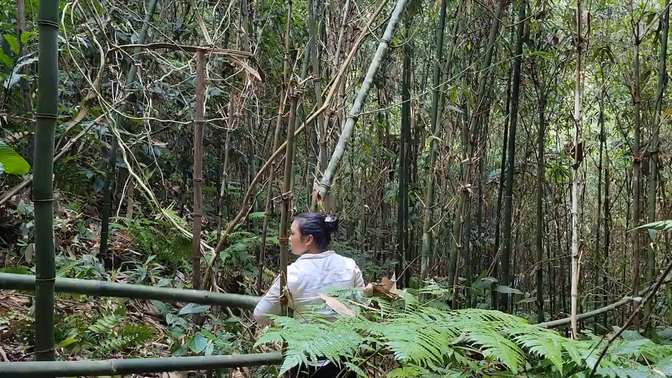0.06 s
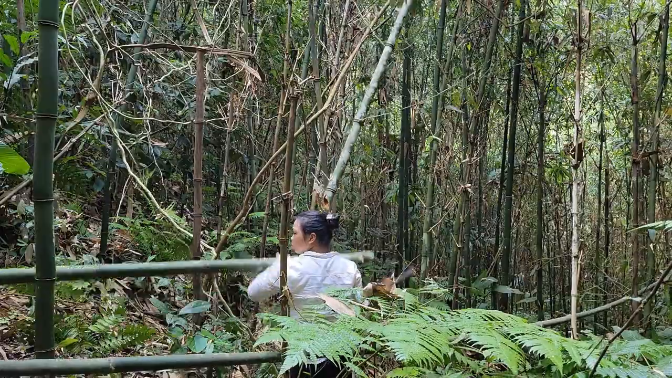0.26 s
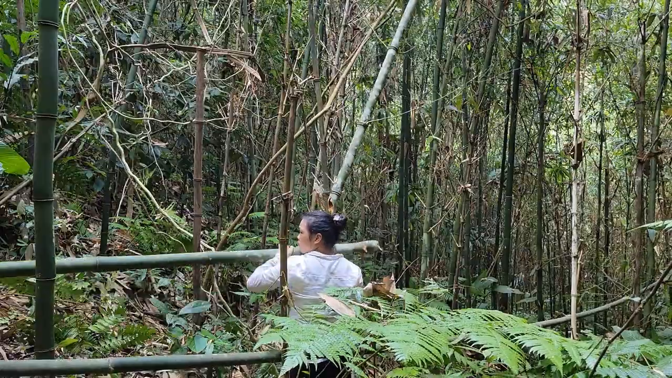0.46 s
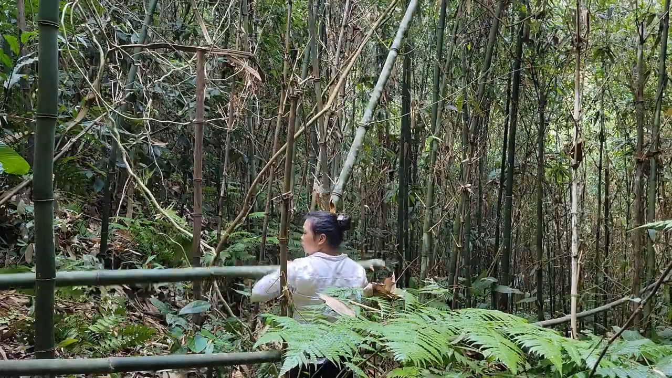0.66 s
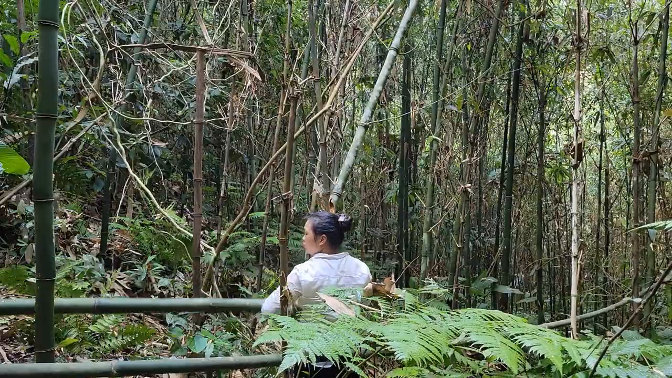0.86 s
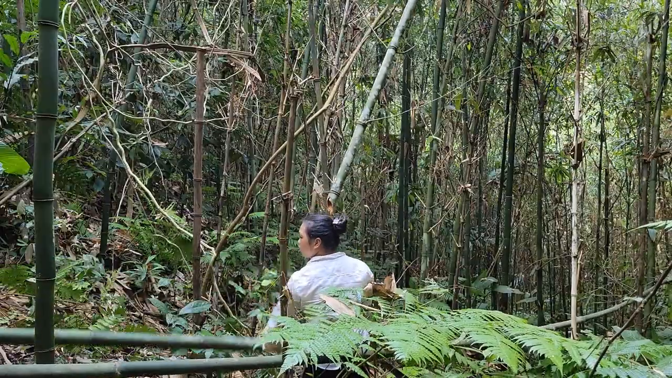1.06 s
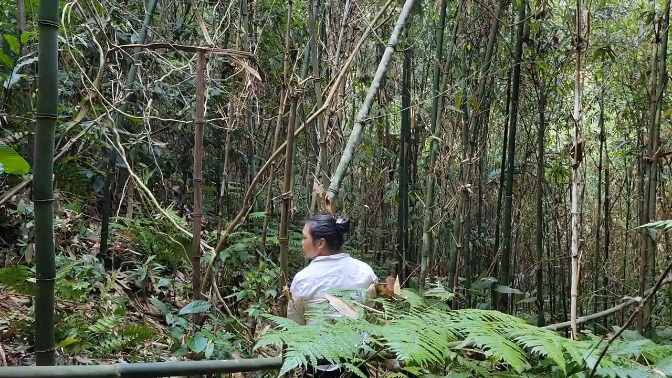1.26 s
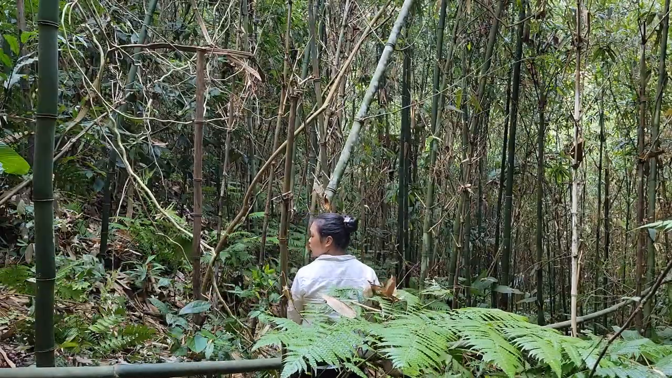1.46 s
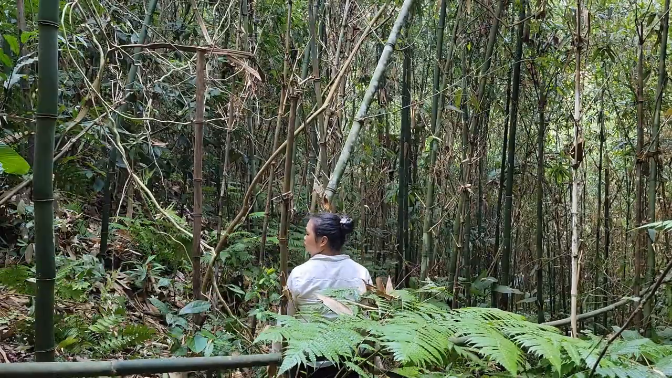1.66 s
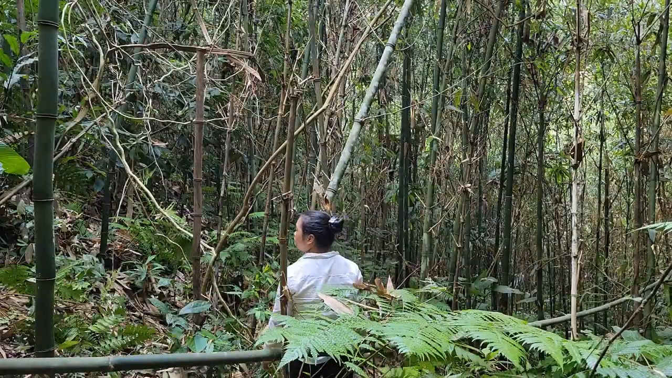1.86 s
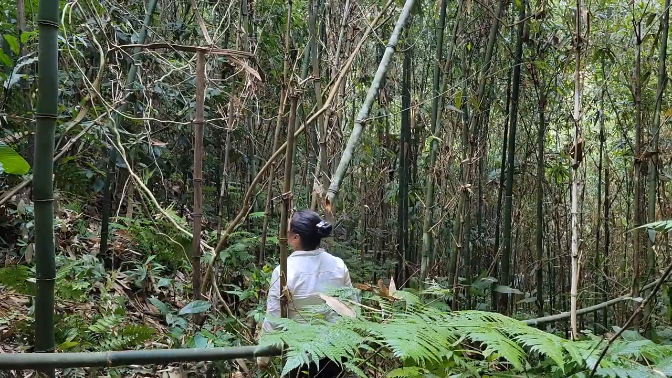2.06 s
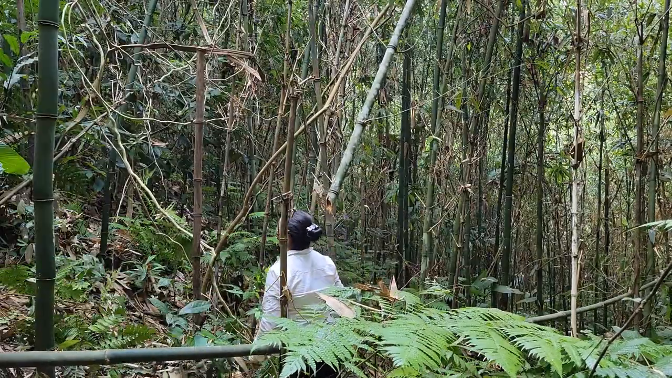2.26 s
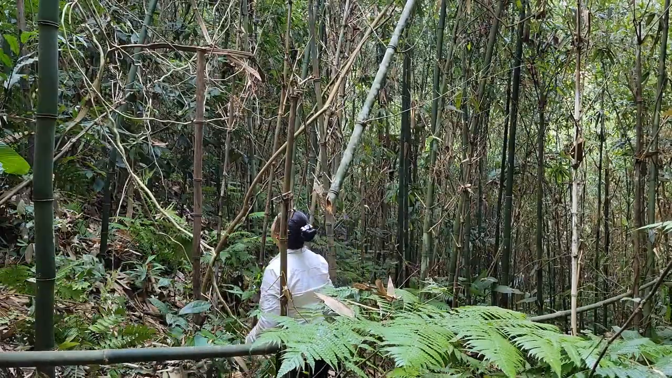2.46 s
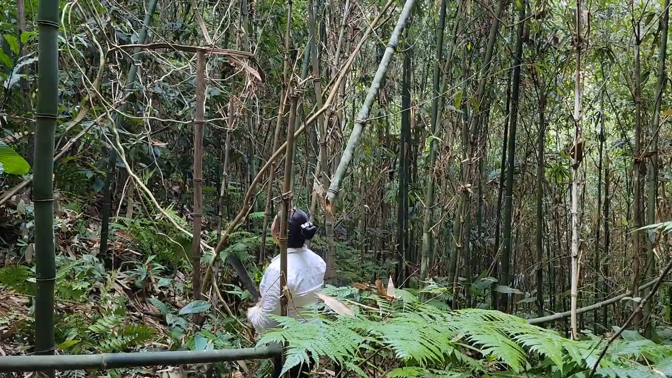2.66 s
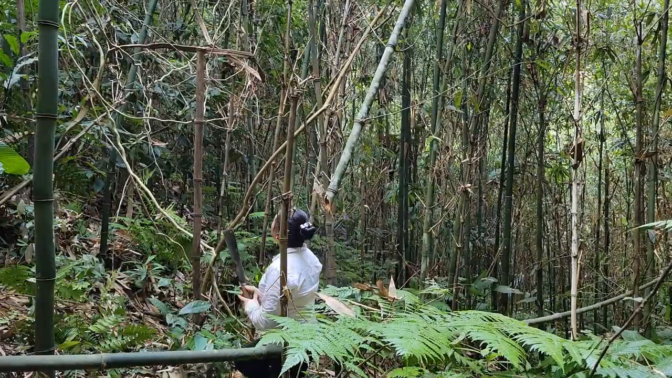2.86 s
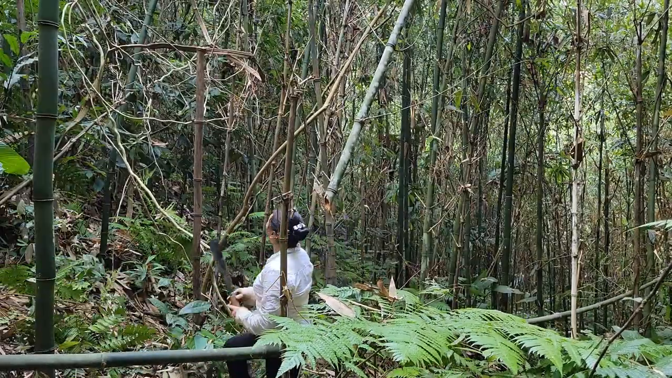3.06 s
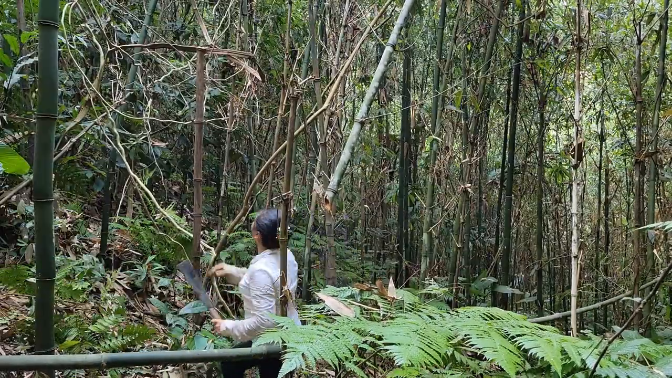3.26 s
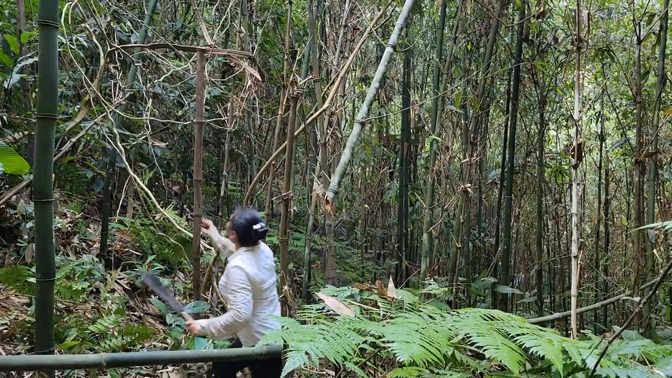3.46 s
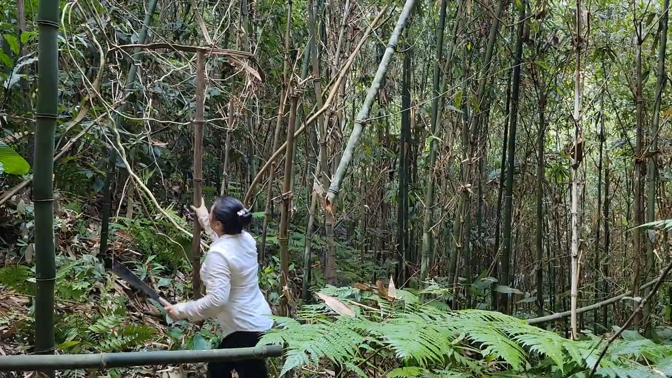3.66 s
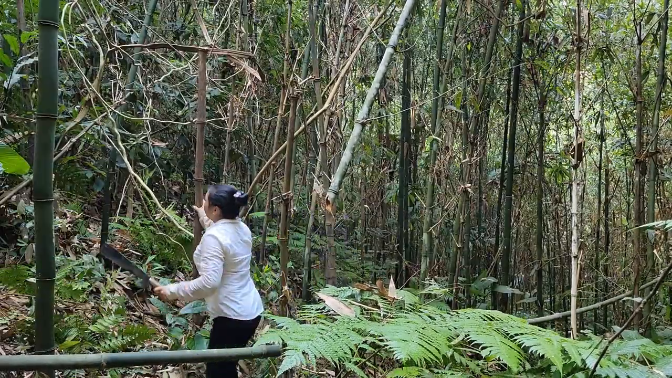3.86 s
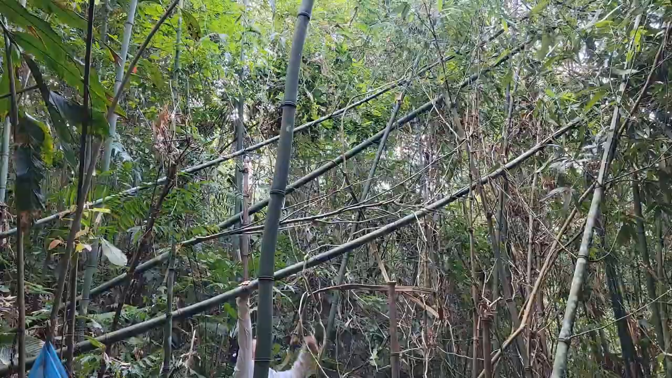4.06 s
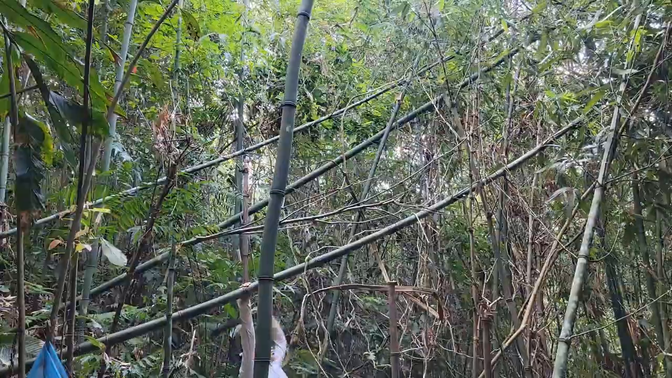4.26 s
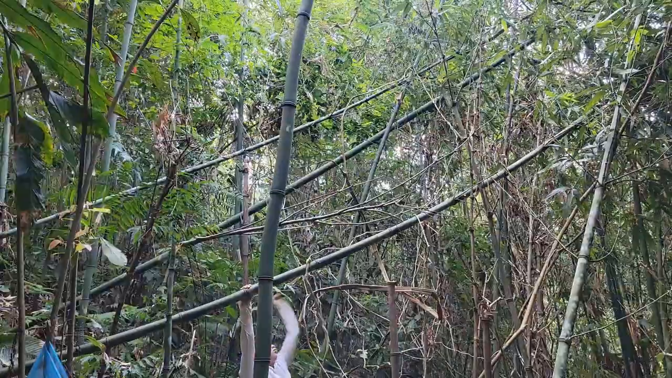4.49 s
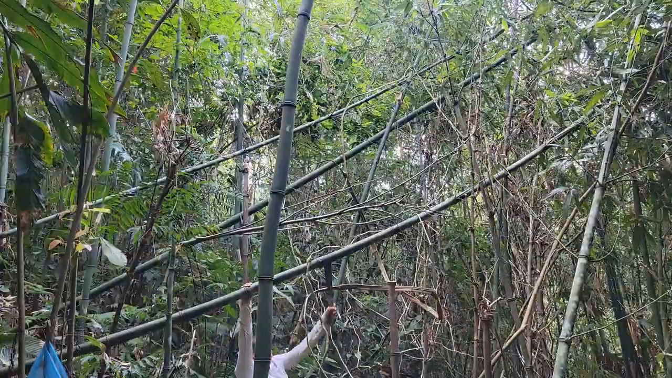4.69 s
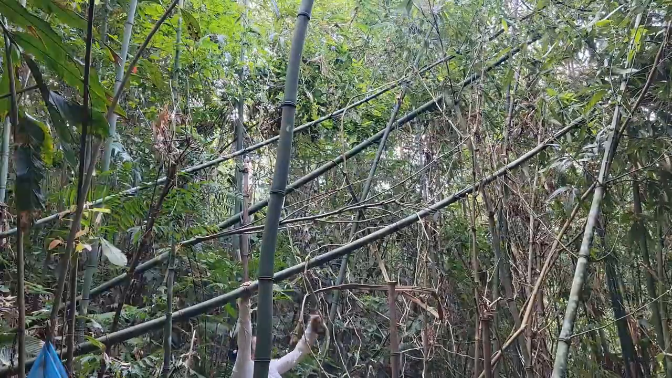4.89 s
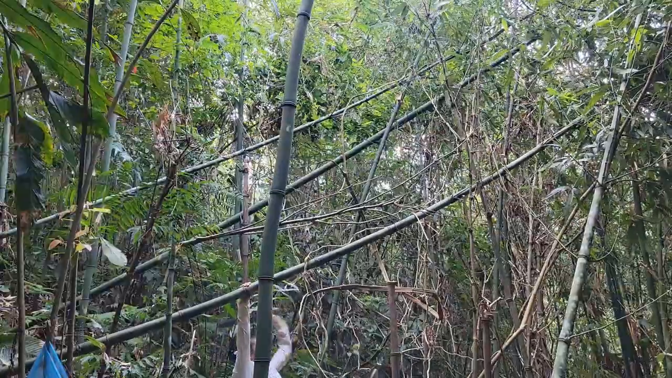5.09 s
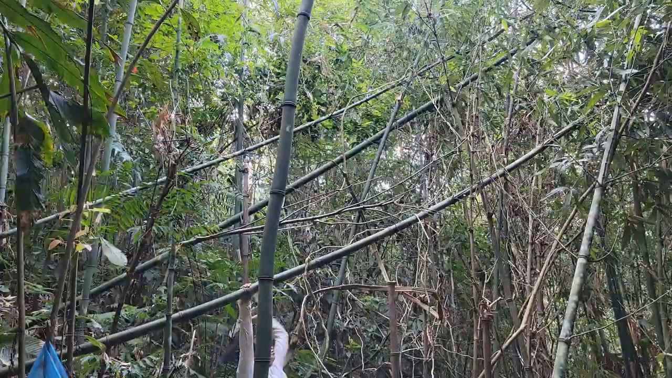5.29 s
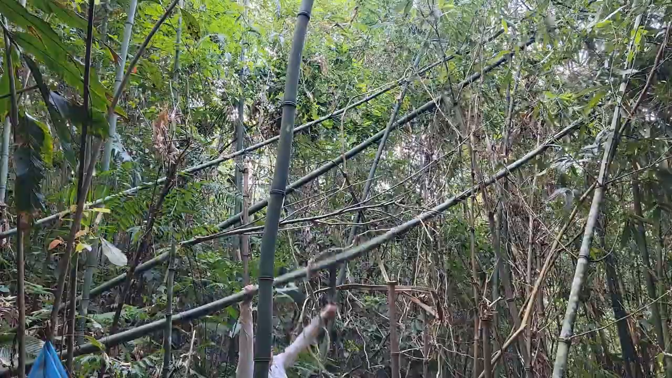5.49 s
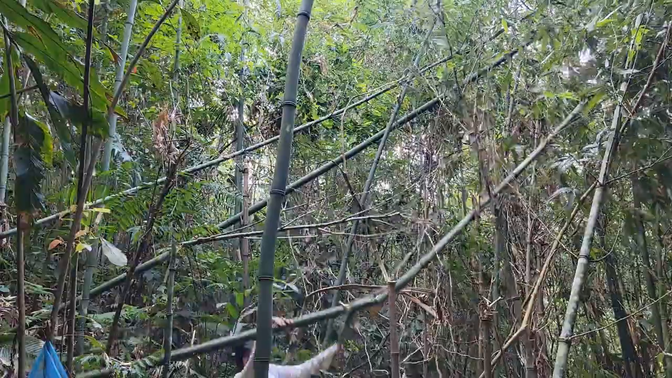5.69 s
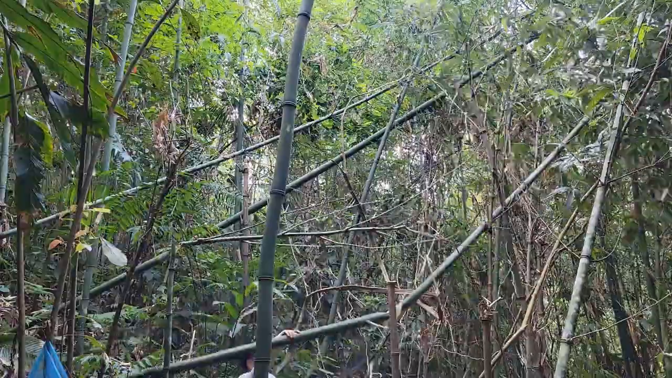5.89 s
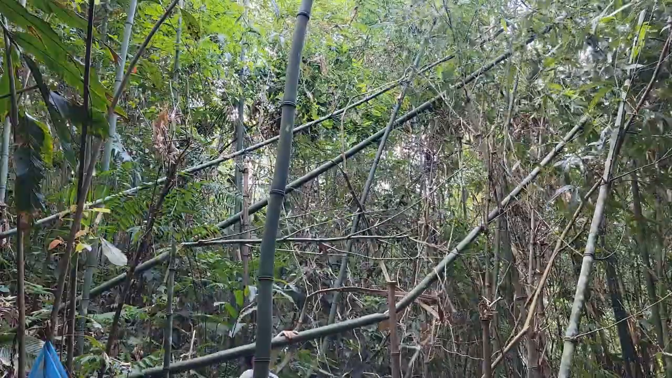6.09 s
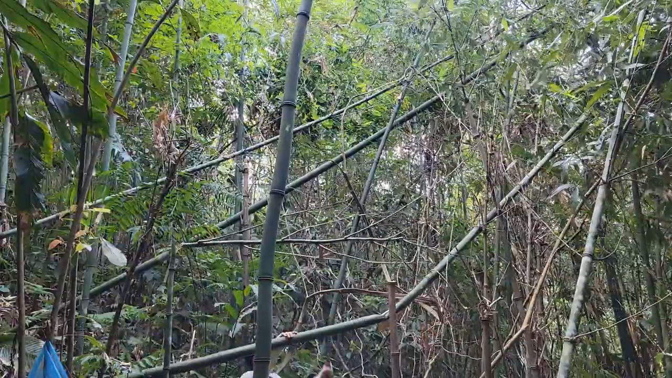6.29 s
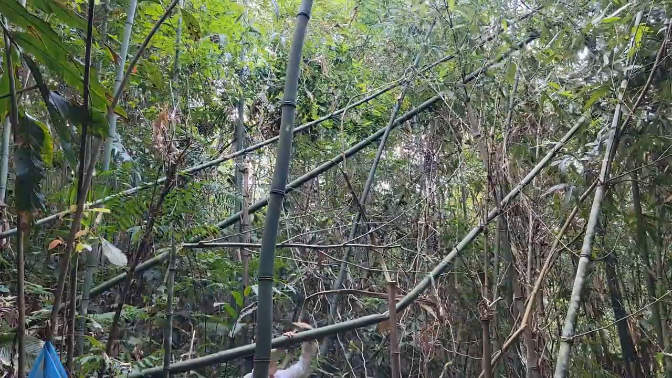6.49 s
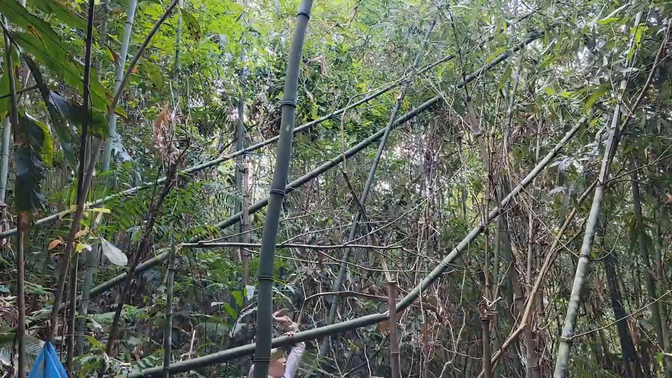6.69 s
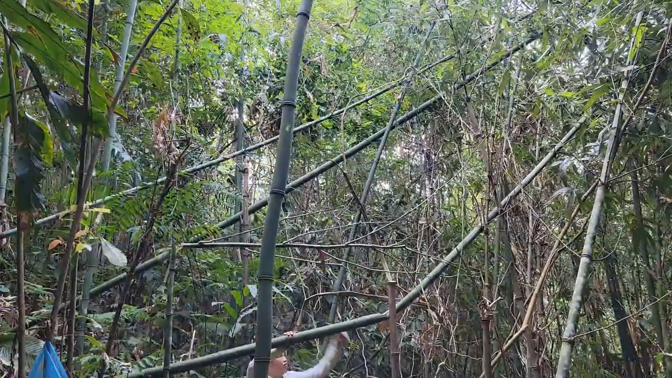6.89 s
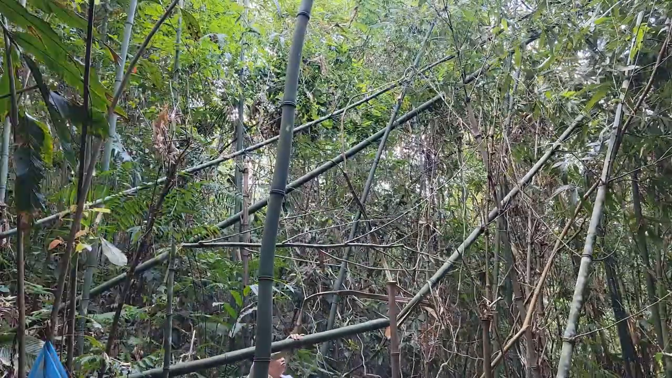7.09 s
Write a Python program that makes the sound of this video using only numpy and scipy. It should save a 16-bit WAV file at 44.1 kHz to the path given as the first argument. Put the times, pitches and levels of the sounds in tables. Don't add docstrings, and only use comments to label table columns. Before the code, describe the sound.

A cut bamboo pole knocks and drags through dry leaves, then after a quiet pause a blade cracks a hollow stem, which splits and rattles down.

```python
import sys
import numpy as np
from scipy import signal
from scipy.io import wavfile
from scipy.ndimage import uniform_filter1d

SR = 44100
rng = np.random.default_rng(int(sys.argv[2]) if len(sys.argv) > 2 else 0)


def rack_gain(trim_db):
    fader = np.asarray(trim_db, float)
    return 10 ** (fader / 20)


def unload_wav(signal):
    wavfile.write(
        sys.argv[1],
        SR,
        np.round(np.clip(np.atleast_2d(signal).T, -1, 1) * 32767).astype(np.int16),
    )


N = 314874

# pitch_hz, likeness (0 to 1)
LIKENESS = [(60, 0.18), (250, 0.14), (600, 0.082), (1200, 0.046), (3000, 0.037), (12000, 0.034)]


def evened(x):
    return x / np.sqrt(np.mean(x ** 2) + 1e-20)


def head(x):
    middle = x[:, :350].mean(0)
    return x / np.sqrt(np.mean(middle ** 2))


def read(points, hz):
    f, value = np.transpose(points)
    return np.interp(np.log(hz + 1), np.log(f + 1), value)


def add(mix, s, sound):
    part = mix[..., round(s * SR):][..., :sound.shape[-1]]
    part += sound[..., :part.shape[-1]]


def placed(sound, pan_db):
    return sound * rack_gain(np.array([[pan_db / 2], [-pan_db / 2]]))


def resonate(x, hz, width):
    r = np.exp(-np.pi * max(width, 10) / SR)
    return signal.lfilter([1 - r, 0, -(1 - r) * r], [1, -2 * r * np.cos(2 * np.pi * hz / SR), r * r], x)


def treble(x, hz):
    return signal.sosfilt(signal.butter(2, hz, "high", fs=SR, output="sos"), x)


def smooth_noise(samples):
    once = uniform_filter1d(rng.standard_normal(N), size=samples)
    return evened(uniform_filter1d(once, size=samples))


def swell(t, s, db, rise_s, fall_s):
    rise, fall = (s - t) / max(rise_s, .001), (t - s) / max(fall_s, .001)
    return rack_gain(db - 10 * np.where(t < s, rise, fall))


def tie(z, hz):
    same = np.clip(read(LIKENESS, hz), 0, 1)[:, None]
    return np.array([z[0], same * z[0] + np.sqrt(1 - same ** 2) * z[1]])


def ports(pair, spectrum, patchy_db):
    hz, t, z = signal.stft(pair, SR, nperseg=512, noverlap=384)
    patches = rng.standard_normal((len(hz), len(t)))
    patches = uniform_filter1d(patches, size=6, axis=0)
    patches = evened(uniform_filter1d(patches, size=14, axis=1))
    colour = rack_gain(read(spectrum, hz)[:, None] + patchy_db * patches)
    sound = signal.istft(tie(z, hz) * colour, nperseg=512, noverlap=384)[1]
    return evened(sound[:, :N])


def crackle(per_s, spread_db, hiss, flicker_db):
    happens = rng.random(N) < per_s / SR
    size = rack_gain(spread_db * np.minimum(rng.exponential(1, N), 5)) * happens
    fizz = signal.oaconvolve(size, np.exp(-np.arange(600) / 90))[:N]
    gain = (evened(fizz) + hiss) * rack_gain(flicker_db * smooth_noise(700))
    return gain * rng.standard_normal((2, N))


def air():
    # pitch_hz, level_db (per Hz)
    air_colour = [(15, -47), (25, 3.5), (149, -22.5), (293, 1.5), (451, -15), (560, 4), (659, -12),
                  (1610, -12.5), (7900, -14), (8200, -27), (16000, -30.5)]
    # pitch_hz, width_hz, level_db
    drone = [(60, 39.4, -90), (284.4, 46, -82.5), (571.6, 38, -79.5)]
    # low_hz, high_hz
    insect_band = (6500, 7950)
    air_db, insects_db = -72, -72.5
    noise = rng.standard_normal((2, N))
    hum = noise[0] + 0.5 * noise[::-1]
    waver = rack_gain(0.7 * smooth_noise(5000))
    bands = np.zeros((2, N))
    for hz, width, db in drone:
        bands += waver * rack_gain(db) * evened(resonate(resonate(hum, hz, width), hz, width))
    only_insects = signal.butter(8, insect_band, "band", fs=SR, output="sos")
    bands += rack_gain(insects_db) * evened(signal.sosfilt(only_insects, noise))
    return rack_gain(air_db) * ports(rng.standard_normal((2, N)), air_colour, 0.8) + bands


def leaves():
    # peak_s, level_db, rise_s and fall_s (per 10 dB), crisp_db (over body)
    stirs = [(0.0, -70, .1, 0.3, -6), (0.113, -54, 0.002, 0.035, -8), (0.275, -60.5, 0.03, 0.1, -6),
             (0.325, -58.5, 0.06, 0.07, -5), (0.6, -67, 2.5, .5, -7.5), (0.98, -68.5, 0.2, 0.5, -12),
             (1.14, -49.5, 0.0959, 0.0643, -3), (1.212, -46.5, 0.008, 0.05, -2),
             (1.35, -44.5, 0.08, 0.1578, -6), (1.56, -56, 0.12, 0.15, 3), (1.71, -52, 0.035, 0.06, 3),
             (1.745, -51, 0.03, 0.05, -2), (1.9, -59, 0.12, 0.2, -4), (1.938, -52, 0.012, 0.06, 0),
             (2.14, -60.5, 0.5, 0.04, -6), (2.56, -65, 0.2, 0.08, -6.5), (2.72, -68, 0.04, 0.04, -3),
             (3.05, -68, -0.03, -0.1, -18), (3.51, -66, 0.14, 0.1, -6.5), (3.73, -67, 0.1, -0.06, -9),
             (3.8, -69, -0.37, 0.04, -5), (3.83, -72, 1, 0.6, -6), (3.91, -61, -1.05, -0.1, -9)]
    shakes = [(4.07, -57, 0.016, 0.1, -0.5), (4.2, -63, 0.089, 1, -4), (4.668, -27, 0.0078, 0.046, -10),
              (4.72, -46, 0.05, 0.1, -16), (4.81, -52, .04, 0.067, -20), (4.93, -61, .15, 0.39, -8),
              (5.35, -68.5, 0.28, 0.26, -17), (5.48, -46, 0.0026, 0.44, -5), (5.65, -28, 0.012, 0.058, -22),
              (5.71, -38.5, .05, 0.14, -3.5), (5.81, -43.5, 0.09, 0.091, -10.5),
              (6.0, -50.5, 0.26, 0.39, -3), (6.048, -57, .02, .02, 0), (6.2, -51, 0.33, 0.43, -9.5),
              (6.6, -60, 0.011, 0.053, -2.5), (6.7, -57.5, .01, 0.047, -11), (6.77, -61, .3, 0.62, -8),
              (6.78, -53.5, 0.011, 0.04, -11.5), (7.04, -32, 0.03, 0.08, -19)]
    treads = [
        (3.16, -52.5, 0.038, 0.06, -5),
        (3.25, -64, 0.054, 0.12, -7),
    ]
    # pitch_hz, level_db
    leaf_colour = [(1200, -12), (2000, -6.5), (2900, -4), (4000, -5), (6000, -5.5), (8500, -11.5),
                   (10000, -27.5)]
    # pitch_hz, level_db
    crisp_colour = [(6000, -15.5), (8000, -4), (11000, -1), (13000, 0.5), (15800, 0.5)]
    # pitch_hz, level_db
    stalk_colour = [(120, -25.5), (250, -10.5), (600, 3.5), (1200, 1.5), (2000, -3.5), (3000, -23)]
    stalks_at_rest_db = -76.5
    t = np.arange(0, N + 32, 32) / SR
    power = np.zeros((3, len(t)))
    power[2] = rack_gain(stalks_at_rest_db) ** 2
    for rows, stalk_db in ((stirs, -11), (shakes, -7), (treads, -4)):
        for *shape, crisp_db in rows:
            share = rack_gain(np.array([[0], [crisp_db], [stalk_db]]))
            power += (share * swell(t, *shape)) ** 2
    body, crisp, stalk = (np.interp(np.arange(N) / SR, t, np.sqrt(p)) for p in power)
    dry_leaves = crackle(per_s=400, spread_db=2.5, hiss=2.6, flicker_db=.9)
    stalks = crackle(per_s=290, spread_db=1.5, hiss=0.97, flicker_db=0.4)
    bed = body * ports(dry_leaves, leaf_colour, 1.4)
    bed += crisp * ports(dry_leaves, crisp_colour, 1.1)
    return bed + stalk * ports(stalks, stalk_colour, 2.5)


def scrape():
    # peak_s, level_db, rise_s and fall_s (per 10 dB)
    drags = [
        (.99, -72, 0.2, 0.4),
        (1.1, -64, 0.02, 0.2),
        (1.245, -66, -0.1, 0.13),
        (1.44, -61, -0.04, 0.21),
        (1.64, -63.5, 0.18, 0.35),
        (1.73, -57, -0.07, 0.1),
    ]
    # pitch_hz, level_db
    skin_colour = [(1800, -32), (2400, 0), (2900, 6), (3300, -9), (4200, -30)]
    t = np.arange(N) / SR
    gain = np.sqrt(sum(swell(t, *row) ** 2 for row in drags))
    return gain * ports(crackle(per_s=310, spread_db=3.0, hiss=.8, flicker_db=-1.0), skin_colour, 1.0)


def boom(length_s, db, hz, chance):
    rumble_share, rumble_hz, rumble_width_hz = 0.15, 84, 50
    t = np.arange(round(length_s * SR)) / SR
    tone = np.sqrt(2) * np.sin(2 * np.pi * hz * t)
    rumble = resonate(chance, rumble_hz, rumble_width_hz)
    rumble = evened(resonate(rumble, rumble_hz, rumble_width_hz))
    two_rumbles = np.array([rumble[-len(t):], rumble[2000:][:len(t)]])
    return rack_gain(db + 0.5) * np.hanning(len(t)) * (tone + rumble_share * two_rumbles)


def booms(mix):
    # middle_s, length_s, level_db, pitch_hz
    bumps = [(1.092, .06, -63, 80), (1.15, .09, -65, 76), (1.25, .12, -46, 75), (1.365, .05, -41, 87),
             (1.392, .055, -40, 80), (1.445, .06, -53, 100), (1.482, .04, -59, 98), (1.53, .06, -60, 103),
             (1.575, .09, -57, 107), (1.62, .06, -64, 105), (1.745, .04, -52, 84), (1.77, .05, -48, 77),
             (1.81, .06, -61, 90), (3.16, .08, -76, 140), (4.675, .05, -51, 120), (4.745, .07, -62, 120),
             (5.545, .06, -52, 75), (5.6, .08, -53, 110), (5.69, .1, -63, 105), (6.062, .04, -61, 72),
             (6.09, .06, -63, 125), (6.138, .07, -61, 73), (6.235, .07, -68, 88), (6.298, .04, -66, 80),
             (6.358, .045, -64, 82), (6.395, .035, -64, 90), (7.017, .035, -50, 95), (7.068, .04, -50, 101),
             (7.095, .035, -56, 100), (7.125, .04, -65, 92), (1.25, .12, -60, 45), (1.385, .08, -54, 48),
             (1.4, .1, -60, 175), (1.55, .1, -68, 170), (4.68, .08, -57, 60), (4.71, .06, -58, 150),
             (5.55, .06, -33, 225), (6.12, .05, -68, 190), (6.37, .05, -68, 200), (7.03, .08, -55, 50)]
    for s, length_s, db, hz in bumps:
        add(mix, s - length_s / 2, boom(length_s, db, hz, rng.standard_normal(SR // 4)))


def strike(db, modes, top_db, top_hz, t60, chance, shared, crack):
    t = np.arange(len(chance)) / SR
    onset = 1 - np.exp(-(t / .0003) ** 2)
    tearing = onset * (rack_gain(-60 * t / max(t60, .005)) + crack * np.exp(-t / .001))
    tearing *= .5 + 1.3 * (chance[:, 2] > 1.9)
    own, common = chance[:, :2].T, chance[:, 3]
    fibres = tearing * (own + shared * common)
    low = tearing * (common + 0.5 * own)
    ring = np.zeros_like(low)
    broad = rack_gain(db + top_db) * head(treble(fibres, top_hz))
    for hz, width, mode_db in modes:
        source = low if hz < 900 else fibres
        sound = treble(resonate(source, hz, max(width, 60)), .4 * hz)
        is_ring = width < 700
        if is_ring:
            sound = resonate(sound, hz, 1.5 * hz)
        add(ring if is_ring else broad, 0, rack_gain(db + mode_db) * head(sound))
    return ring, broad


def ticks(mix):
    # start_s, peak_db, pitch_hz, left_right_db
    snaps = [(0.2655, -50, 2650, 5), (0.5433, -55, 2150, 0.0), (0.952, -62, 2620, 2.0),
             (0.97, -54, 2630, -2), (1.025, -59, 2800, 2.0), (1.059, -59, 3040, 3.0), (1.088, -47, 3000, 7),
             (1.0974, -55, 2650, 3.5), (1.14, -52, 2490, 3.0), (1.2088, -40, 4720, 1.0),
             (1.5525, -51, 4830, 0), (1.6761, -42.5, 1880, 6), (1.7987, -44, 2290, 5),
             (2.1939, -55, 4960, -0.5), (2.491, -51.5, 5480, -3), (2.5578, -50, 2900, -1.0),
             (2.674, -55, 3060, -5), (2.9394, -70, 4610, -1.5), (3.1375, -46, 1780, 2),
             (3.2646, -52, 2040, 0.5), (3.3195, -53, 3000, 1.0), (3.363, -53.5, 1820, 2),
             (3.609, -52.5, 3070, 0.5), (3.711, -57, 2480, 2.0), (3.7916, -57, 2020, -4),
             (3.879, -61, 1810, -0.5), (4.0524, -55, 3200, -1.5), (4.2472, -51.5, 3440, -2.5),
             (4.2607, -46.5, 3600, -7), (5.0658, -45.5, 2080, -2), (6.1365, -40, 1840, -5),
             (6.2358, -40, 1500, 0), (6.4073, -44.5, 1870, -0.5), (6.4797, -45, 2800, -3),
             (6.5962, -51, 3800, -2), (6.6942, -48.5, 2880, -1), (6.772, -48, 4020, -1.5),
             (6.844, -49, 2620, 0.5)]
    for s, db, hz, pan_db in snaps:
        chance = rng.standard_normal((1000, 4))
        modes = [(hz, max(0.36 * hz, 700), 0)]
        _, snap = strike(db - 14, modes, -7, 5100, .008, chance, shared=0.33, crack=1.4)
        add(mix, s, placed(snap, pan_db))


def add_strike(near, far, s, ring, broad, pan_db, scatter_db):
    crack_s = s + .0012
    add(near, crack_s, placed(ring + broad, pan_db))
    add(far, crack_s, placed(.5 * ring + broad, pan_db) * rack_gain(scatter_db))


def taps_and_knocks(near, far):
    # start_s, peak_db, ring_hz, treble_db (over body), left_right_db
    taps = [(0.1088, -52, 2400, 19.5, 6), (0.214, -60, 2660, -6, -13), (0.559, -54.5, 1170, -13.5, -2.5),
            (0.842, -69, 564, 19, 5), (0.902, -54, 1000, -16, -5), (0.987, -56.5, 2870, 14.5, 11),
            (1.208, -52, 960, -3, 1.5), (1.239, -49, 2640, -2, 6), (1.551, -55.5, 689, -4.5, -13.5),
            (1.645, -52.5, 3000, -4, 17), (1.675, -52, 700, -8, 4), (1.763, -60, 660, 17, 0),
            (1.797, -48, 650, -11, -2), (2.134, -49, 1860, -2, 1), (2.525, -55, 2960, -23, -7),
            (2.556, -62.5, 583, -10, -8), (2.983, -60, 580, -19, -12), (3.047, -56.5, 3020, 4, 0),
            (3.214, -53, 2660, -14, 4), (3.318, -55.5, 560, -11, -6), (3.555, -53.5, 3000, -18, -1),
            (3.714, -61, 554, -13, -3), (3.794, -62.5, 514, 12, -2), (3.832, -58, 560, 12.5, -3)]
    knocks = [(4.068, -49, 3200, -25, -7), (4.128, -52.5, 1320, -11, -3), (4.26, -54, 1900, -31, -2),
              (4.351, -57, 1250, -4, -7), (4.492, -51.5, 1000, -18, -3), (5.066, -54, 1120, -20, 3.5),
              (5.476, -28.5, 1320, -26, -2), (5.69, -28, 895, 0, -13), (5.728, -30, 1723, -16, -8),
              (5.759, -29, 800, -29, -6.5), (5.854, -38, 1950, -11, -3), (5.994, -42, 630, -8, -9),
              (6.334, -46, 901, -24.5, -10), (6.369, -46.5, 1250, -36, -11), (6.698, -49, 2850, -15, -4),
              (6.774, -47, 2960, -9.5, -2), (6.915, -45, 1407, -18.5, -6), (6.924, -40, 1450, -24, -3)]
    for rows, t60_s in ((taps, 0.031), (knocks, 0.051)):
        for s, db, hz, top_db, pan_db in rows:
            chance = rng.standard_normal((3000, 4))
            modes = [(hz, .12 * hz, 0), (1.2 * hz, .9 * hz, -4)]
            ring, broad = strike(db - 13.0, modes, top_db - 5.5, 4300, t60_s, chance, shared=0.27, crack=0.78)
            add_strike(near, far, s, ring, broad, pan_db, -7)


def grove(x):
    # pitch_hz, t60_s (time to fall 60 dB)
    decay = [(200, 0.17), (530, 0.26), (1400, 0.24), (3700, 0.27), (9700, 0.32)]
    echoes = np.zeros((2, SR // 2))
    at = np.arange(120, SR // 2 - 20, 20) + rng.integers(0, 20, (2, (SR // 2 - 121) // 20))
    np.put_along_axis(echoes, at, rng.choice([-1., 1.], at.shape), 1)
    hz, t, z = signal.stft(echoes, SR, nperseg=256)
    dying = rack_gain(-60 * t / read(decay, hz)[:, None])
    tail = signal.istft(tie(z, hz) * dying, SR, nperseg=256)[1]
    return signal.fftconvolve(x, tail / np.linalg.norm(tail[0]), axes=1)[:, :N]


def rebound(length_s, db, hz, chance):
    left_lag_s, roughness = .00014, .22
    t = np.arange(round(length_s * SR)) / SR
    rough = evened(resonate(chance, hz, 150))[:, -len(t):]
    tone = np.sin(2 * np.pi * hz * (t - np.array([[left_lag_s], [0]])))
    shape = np.sin(np.pi * (t / length_s) ** 0.87) ** 2
    return rack_gain(db) * shape * (tone + roughness * rough)


def rebounds(mix):
    # middle_s, length_s, peak_db, ring_hz
    rings = [(0.604, 0.0088, -43, 1270), (1.688, 0.017, -55, 686), (1.76, 0.019, -60, 676),
             (1.786, 0.026, -54, 680), (1.805, 0.023, -53.5, 684), (4.6632, 0.0049, -27, 2400),
             (4.664, .011, -17.5, 940), (4.667, .014, -31, 568), (4.659, .011, -25, 1250),
             (4.736, .03, -53, 886), (4.776, 0.046, -51, 1254), (4.788, 0.17, -49.5, 2200),
             (4.711, .025, -35, 2245), (5.534, .014, -15.5, 562), (5.548, 0.03, -16.5, 1250),
             (5.552, .012, -20, 830), (5.555, 0.024, -18.5, 559), (5.57, 0.02, -28, 1230),
             (5.574, 0.029, -26.5, 560), (5.641, .007, -7, 1490), (5.64, 0.0071, -11, 756),
             (5.65, .018, -25.5, 560), (5.655, .014, -24, 1450), (5.641, 0.038, -42, 300),
             (5.817, 0.027, -32, 796), (5.967, .014, -40.5, 560), (6.052, .012, -38, 1380),
             (6.066, 0.011, -44, 1450), (6.147, .024, -45, 1320), (6.149, .022, -41.5, 1860),
             (6.244, 0.024, -38, 1320), (6.012, .03, -50, 2480), (6.285, .03, -53, 2800),
             (7.002, .01, -14.5, 1864), (7.02, .02, -31, 600), (7.036, .02, -29, 903),
             (7.008, 0.015, -20, 778), (7.027, .018, -16, 1368), (7.044, 0.034, -22, 562),
             (7.065, 0.016, -23.5, 1320), (7.066, 0.012, -37, 864), (7.083, .045, -35.5, 560),
             (7.121, .014, -44, 1320), (7.122, .014, -44, 560)]
    for s, length_s, db, hz in rings:
        ring = rebound(length_s, db, hz, rng.standard_normal((2, SR // 5)))
        add(mix, s - length_s / 2, placed(ring, -3.5))


def bites(mix):
    # start_s, peak_db, wall_ring_hz
    cracks = [
        (4.6594, -5, 2450),
        (4.6602, -5, 2350),
        (5.5292, -3, 2100),
        (5.536, -1, 2900),
        (5.6371, -8, 3900),
        (5.6382, -4, 2800),
        (6.9973, -7, 2600),
        (6.9999, -8, 1900),
    ]
    t = np.arange(300) / SR
    for s, db, hz in cracks:
        push = rack_gain(db - 60 * t / .003) * np.sin(2 * np.pi * hz * t)
        add(mix, s, placed(treble(push, 500), -1.5))


def blows(near, far):
    # start_s, peak_db, treble_db (over body), splinter_t60_s, scatter_db
    hits = [(0.6, -38, -34, 0.015, -6), (1.344, -23, -19, 0.09, -8.5), (1.733, -36.5, -3, 0.029, 4.5),
            (1.929, -34.5, -33, 0.052, -11), (4.603, -35, -12, 0.026, 3), (4.6586, -9, -21, 0.053, -5),
            (5.528, -6, -11, 0.2, -3.5), (5.5352, -18.5, -14, 0.012, 4), (5.636, -4.5, -20, 0.039, -4.5),
            (5.804, -19.5, -10, 0.047, -4), (5.9605, -41.5, -20, 0.041, -6.5),
            (6.044, -42.5, -23, 0.067, -7), (6.1351, -36, -20, 0.059, -15),
            (6.234, -39.5, -27.5, 0.058, -1), (6.996, -9, -11, 0.2, -2.5)]
    # pitch_hz, width_hz, level_db
    whole_stems = [
        [(1270, 120, -4), (1900, 120, -13), (2450, 200, -19), (780, 90, -13.5)],
        [(602, 55, -1), (250, 200, -8.5), (1250, 1200, -0.5), (2520, 1600, -5)],
        [(660, 140, -4.5), (1130, 140, -6.5), (267, 81, -12)],
        [(1250, 500, 6), (1740, 170, -5), (670, 33, -10), (2200, 920, -1.5)],
        [(450, 1200, -6), (1500, 900, -7.5), (3280, 1070, -5.5)],
        [(548, 71, -8.5), (271, 72, -11), (877, 110, -7), (1250, 150, -5), (2240, 347, -6.5), (2400, 4500, -2)],
        [(564, 84, -5.5), (247, 105, -15), (347, 100, -9), (825, 180, -7), (1250, 245, -13), (1900, 4250, 0)],
    ]
    # pitch_hz, width_hz, level_db
    split_stems = [
        [(600, 320, -14.5), (2530, 2000, -1.5)],
        [(523, 69, -11), (788, 83, -7.5), (1490, 620, -2.5), (2800, 5500, -1.5)],
        [(554, 32, -4.5), (810, 33, -7), (1450, 360, -1), (1824, 350, 1.5), (2480, 670, -10)],
        [(560, 84, 0), (1170, 280, 6.5), (1900, 170, -32)],
        [(1420, 180, 3), (1900, 660, 3)],
        [(1860, 52, 0), (1320, 53, -9)],
        [(1270, 140, 0), (1000, 220, 1)],
        [(594, 73, -2.5), (323, 46, -16.5), (416, 49, -11), (875, 86, -6.5), (1120, 280, -6.5),
         (1326, 701, -5.5), (1900, 260, -15), (2400, 4600, -3)],
    ]
    # time_s, left_right_db
    place = [(0.6, -6), (1.3, 0.5), (4.6, 0.5), (5.6, 0.5), (5.95, -8), (6.15, -5.5), (6.95, -2)]
    for (s, db, top_db, t60_s, scatter_db), modes in zip(hits, whole_stems + split_stems):
        chance = rng.standard_normal((6000, 4))
        pan_db = np.interp(s, *np.transpose(place))
        ring, broad = strike(db - 9.5, modes, top_db - 0.5, 5500, t60_s, chance, shared=0.47, crack=0.79)
        add_strike(near, far, s, ring, broad, pan_db, scatter_db)


def scene():
    near, far = np.zeros((2, N)), np.zeros((2, N))
    taps_and_knocks(near, far)
    blows(near, far)
    near, far = treble(near, 140), treble(far, 140)
    background = air() + leaves() + scrape() + grove(far)
    booms(near)
    ticks(near)
    rebounds(near)
    bites(near)
    return background + near


def band_limit(x):
    return signal.sosfilt(signal.butter(12, 17000, fs=SR, output="sos"), x)


def record(dry):
    top = signal.butter(4, 13000, "high", fs=SR, output="sos")
    lifted = dry + 0.23 * signal.sosfiltfilt(top, dry)
    side = (lifted[0] - lifted[1]) / 2
    bass_band = signal.butter(1, (40, 280), "band", fs=SR, output="sos")
    lifted = lifted - signal.sosfiltfilt(bass_band, side) * np.array([[1], [-1]])
    clipped = np.clip(lifted, -.95, .95)
    edge = signal.firwin(255, 15900, window=("kaiser", 7), fs=SR)
    finished = signal.oaconvolve(clipped, edge[None], "same")
    return band_limit(finished)


dry = scene()
out = record(dry)
unload_wav(out)
```